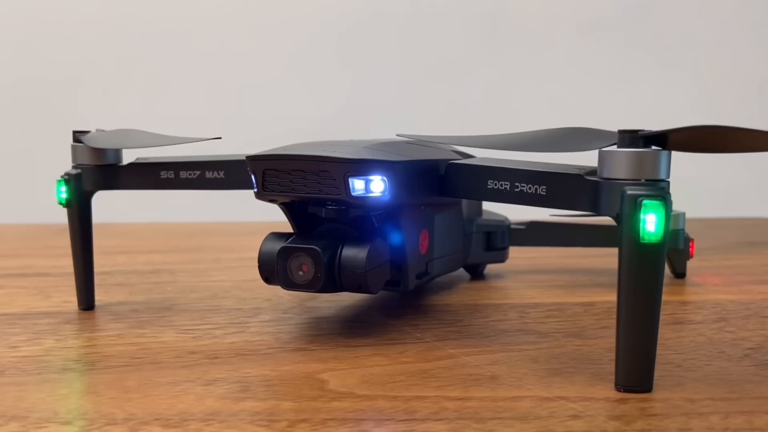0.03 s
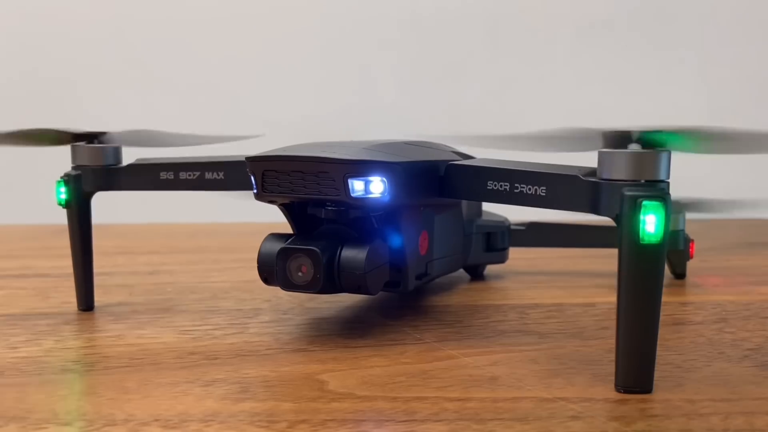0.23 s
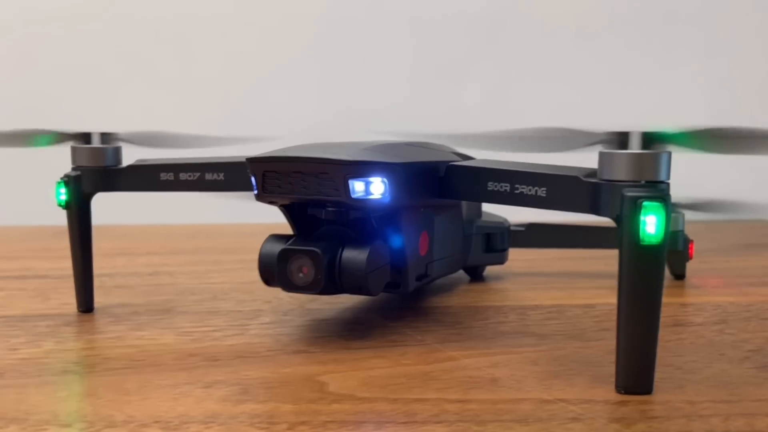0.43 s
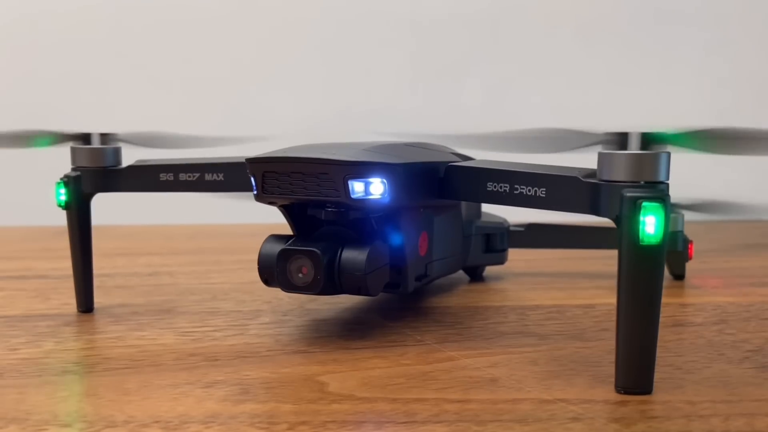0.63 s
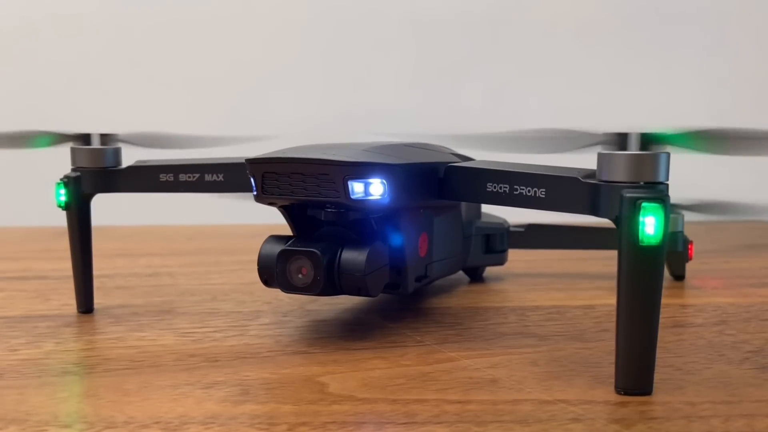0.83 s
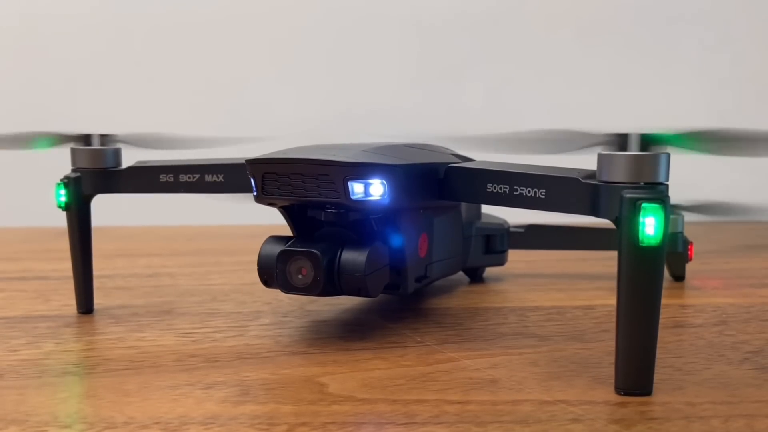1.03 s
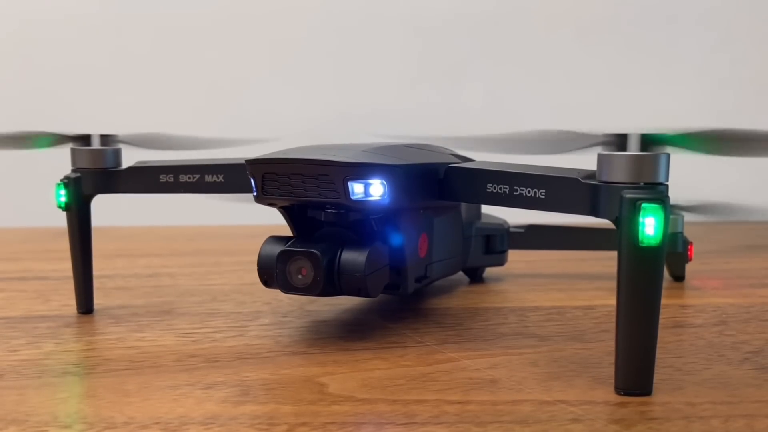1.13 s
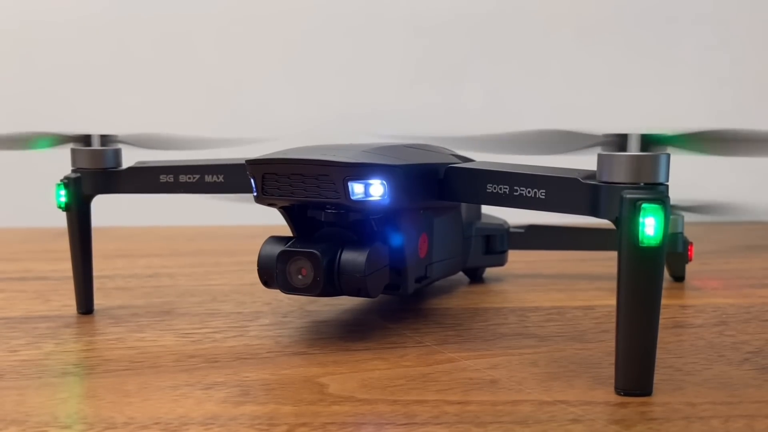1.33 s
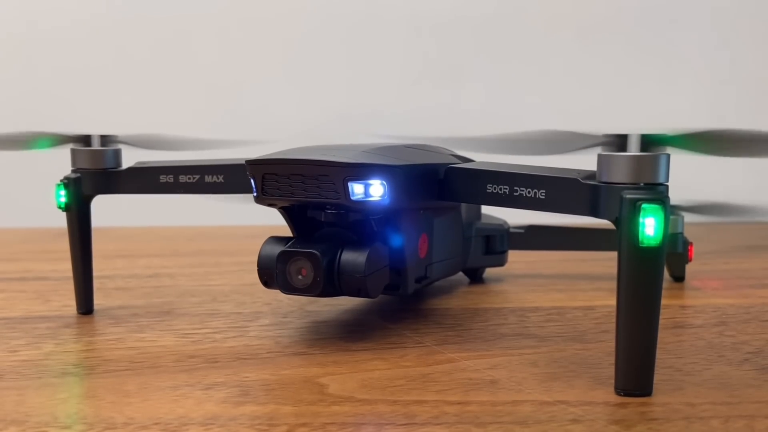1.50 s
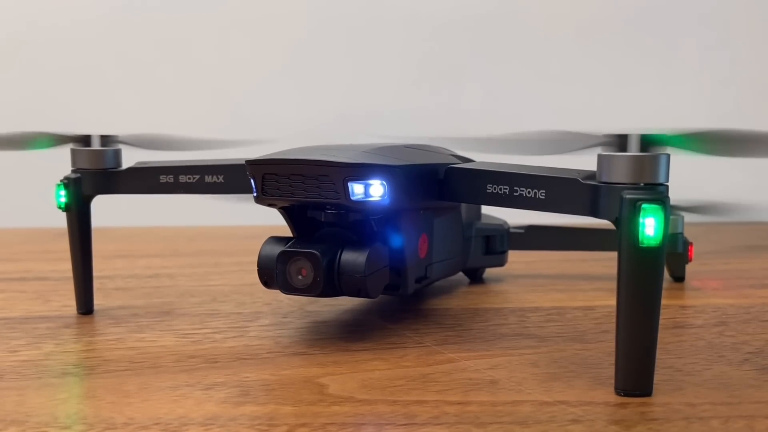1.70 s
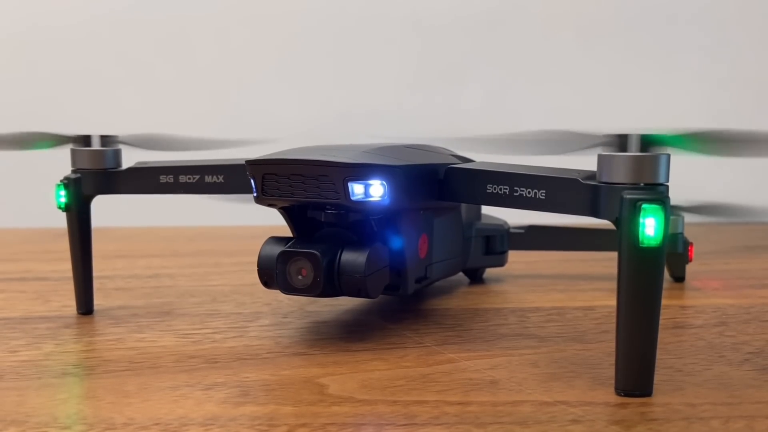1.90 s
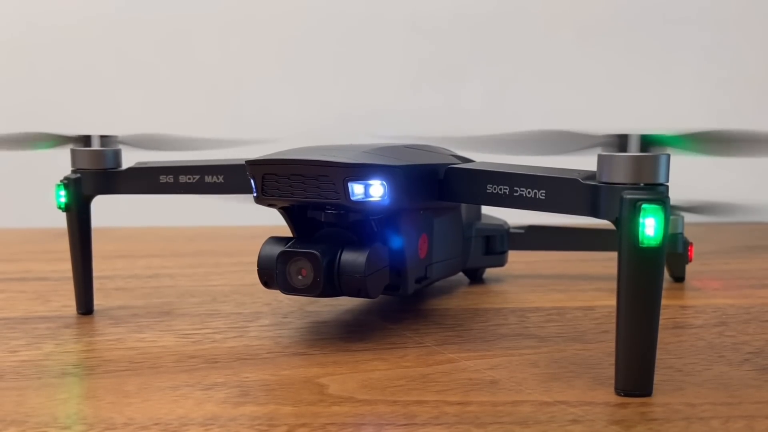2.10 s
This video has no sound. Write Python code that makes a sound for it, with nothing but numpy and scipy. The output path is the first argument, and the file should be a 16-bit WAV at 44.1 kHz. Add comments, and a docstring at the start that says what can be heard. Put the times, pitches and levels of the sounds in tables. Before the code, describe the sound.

A small quadcopter drone starts up close to the microphone in a quiet small room. Sharp plastic blade clacks come at 0.05-0.2 s, then the whine jumps up around 0.28 s, dips, and climbs again to about 0.7 s. Hard low wind buffeting bursts at 0.33 s and from 0.5 to 0.8 s. Pitch falls quickly, leaving a steady, slightly beating high whine, hiss and faint flutter until about 2 s.

```python
"""Small quadcopter starting up on a table

Indoors in a quiet room: a small quadcopter on a wooden table, close to a two-port microphone.
Folding blades clack open as noise bursts with a plastic ring; four brushless motors, as sums of sines, surge
twice and sink to idle, whining at slightly different speeds over the filtered-noise hiss of their drive.
Downwash buffets the microphone as low noise and short pressure waves: hard in the surges, lighter afterwards."""
import sys
import numpy as np
from scipy import signal
from scipy.fft import rfft, irfft, next_fast_len
from scipy.io import wavfile
from scipy.ndimage import uniform_filter1d, minimum_filter1d, map_coordinates

SR = 44100
rng = np.random.default_rng(int(sys.argv[2]) if len(sys.argv) > 2 else 0)


def to_wav(s):
    """Save 16-bit WAV."""
    ch = np.atleast_2d(s).T  # columns
    pcm = np.round(np.clip(ch, -1, 1) * 32767)  # PCM
    wavfile.write(sys.argv[1], SR, pcm.astype(np.int16))


N = 94815
T = np.arange(N) / SR  # t/s of every sample
LEFT_RIGHT = np.array([[1], [-1]])


def amp(db):
    """Decibels to gain."""
    return 10 ** (np.asarray(db) / 20)


def unit(x):
    """Scale to rms 1."""
    return x / np.sqrt(np.mean(x ** 2) + 1e-20)


def along(points, hz):
    """Read (f/Hz, value) points on a log frequency axis."""
    f, v = np.transpose(points)
    return np.interp(np.log(hz + 1), np.log(f + 1), v)


def curves(rows):
    """One value per sample for each column after t/s."""
    s, *columns = np.transpose(rows)
    return [np.interp(T, s, column) for column in columns]


def wobble(rate):
    """A smooth random curve with rate knots a second."""
    return map_coordinates(rng.standard_normal(1024), [T * rate + 3], mode="wrap")


def filtered(x, response):
    """Filter x by a response given as a function of frequency."""
    padded = next_fast_len(N + 8192)
    spectrum = rfft(x, padded) * response(np.fft.rfftfreq(padded, 1 / SR))
    return irfft(spectrum, padded)[..., :N]


def sides(lean_db):
    """Left and right gains for a level difference, left over right."""
    return amp(LEFT_RIGHT * lean_db / 2)


def noise(colour):
    """Mono noise of rms 1 with a (f/Hz, level/dB) colour."""
    return unit(filtered(rng.standard_normal(N), lambda hz: amp(along(colour, hz))))


# likeness of the two microphone ports: (f/Hz, correlation, held within +-0.995)
PORT_LIKENESS = [(100, -0.1), (600, 2), (1000, 1.5), (1300, .5), (2000, 0.86), (2800, -0.1), (4000, 2.3),
                 (5500, -0.64), (7000, 2), (8000, 0), (9150, -1.455), (10000, -0.15), (11000, 2.2),
                 (12200, 0), (13200, -1), (14200, -0.3), (15000, .5)]
# how airborne sound leans to one port: (f/Hz, left over right level/dB)
PORT_LEAN = [(350, 4.5), (600, 0.5), (1250, 3.5), (2100, -3), (3100, 5), (4500, 4.5), (6500, 0)]


def airborne(gain):
    """Stereo noise of rms 1 with a given gain per frequency, partly alike at the two ports."""
    def mid_side(hz):
        turn = np.arccos(np.clip(along(PORT_LIKENESS, hz), -.995, .995)) / 2
        return gain(hz) * np.array([np.cos(turn), np.sin(turn)])
    mid, side = filtered(rng.standard_normal((2, N)), mid_side)
    ports = np.array([mid + side, mid - side])
    return unit(filtered(ports, lambda hz: sides(along(PORT_LEAN, hz))))


def rush(colour):
    """Airborne noise with a (f/Hz, level/dB) colour."""
    return airborne(lambda hz: amp(along(colour, hz)))


# whine pitch while spinning up; after the last point the motors coast down: (t/s, f/Hz)
SPIN_UP_PITCH = [(.06, 2116), (.175, 2087), (.195, 1819), (.22, 1835), (.25, 2650), (.285, 3287),
                 (.32, 2663), (.36, 2267), (.41, 2134), (.46, 2245), (.51, 2513), (.57, 2907), (.63, 3370),
                 (.682, 3765)]
IDLE_HZ = 1870
# quick fall, slow settling, and the share of the drop left to the slow one
BRAKE_S, SETTLE_S, SETTLE_SHARE = .08, .18, .17


def motor_speed():
    """Speed relative to idle: two surges, then a coast down with a fast and a slow decay."""
    top_s, top_hz = SPIN_UP_PITCH[-1]
    since = np.maximum(T - top_s, 0)
    quick = (1 - SETTLE_SHARE) * np.exp(-since / BRAKE_S)
    slow = SETTLE_SHARE * np.exp(-since / SETTLE_S)
    pitch = curves(SPIN_UP_PITCH)[0] - (top_hz - IDLE_HZ) * (1 - quick - slow)
    return uniform_filter1d(pitch, size=500) / IDLE_HZ


# colour of the quiet room's noise floor: (f/Hz, relative level/dB)
FLOOR_COLOUR = [(25, -39), (70, -9), (130, -39), (350, 7), (1000, -7), (3000, -29), (15000, -65)]
FLOOR_DB = -60


def room_floor():
    """The quiet room's steady background, as coloured noise on both ports."""
    return amp(FLOOR_DB) * rush(FLOOR_COLOUR)


EDDY_FALL = 0.33  # how far the pitch leans downward in passing


def eddy(s, hz, length):
    """A swirl of air passing the port: a short pressure wave that ends lower in pitch than it began."""
    u = (T - s) / length
    turns = hz * length * (np.arcsinh(u) - EDDY_FALL * np.log(1 + u ** 2) / 2)
    turns = turns + rng.normal(0, 0.071)
    return -np.sin(2 * np.pi * turns) / (1 + u ** 2) ** 1.91


# strength of the downwash at the microphone, before lumps and low cut: (t/s, level/dB)
WASH_STRENGTH = [(0, -53), (.05, -60), (.09, -38.5), (.14, -43.5), (.23, -27.5), (.318, -28.5),
                 (.335, -12.5), (.365, -11), (.42, -24.5), (.46, -22.5), (.5, -18.5), (.57, -17),
                 (.61, -13.5), (.69, -14.5), (.75, -15), (.775, -20.5), (.81, -14.5), (.84, -25), (.9, -34),
                 (1.05, -34), (1.13, -34.5), (1.25, -37.5), (1.4, -40.5), (1.65, -38.5), (1.85, -42),
                 (2.15, -48)]
# colours of the deep and the brighter turbulence: (f/Hz, relative level/dB)
RUMBLE_COLOUR = [(15, -65), (30, -16), (45, -12), (62, 3), (100, -0.5), (160, -6), (250, -12.5),
                 (400, -17.5), (700, -41), (1500, -66), (4000, -100)]
FLUTTER_COLOUR = [(60, 9), (160, -6), (330, -12.5), (460, -1), (620, -10.5), (850, -21.5), (1300, -29.5),
                  (3000, -66), (8000, -90)]
# strong eddies striking the microphone: (t/s, level/dB, f/Hz in the middle, length/s)
STRONG_EDDIES = [(.331, 0, 166, 0.0049), (.339, -10, 440, 0.0043), (0.354, -4, 340, 0.0029),
                 (0.364, -5, 140, 0.0037), (0.374, -12, 490, 0.0036), (.395, -16.5, 305, 0.0052),
                 (0.467, -13.5, 250.3, 0.0038), (0.494, -6.5, 260.8, 0.0038), (0.511, -10.5, 80.5, .0074),
                 (0.534, -9, 133, 0.0063), (0.554, -8.5, 262, 0.0057), (0.576, -9.5, 296, .003),
                 (0.594, -10, 430, 0.0056), (.606, 4, 260, 0.0023), (0.618, -10.5, 460, 0.0022),
                 (.629, -6.5, 358, 0.0041), (0.647, 0.5, 307.7, .0026), (.665, 3, 420, 0.0042),
                 (.679, 0, 436, 0.002), (.703, -10, 460, 0.0019), (0.707, -7.5, 256, 0.0031),
                 (0.733, -8.5, 450, 0.0038), (0.737, -0.5, 230, 0.0031), (0.8, -6, 600, 0.0021),
                 (.802, 2, 243, .0027), (.846, -16.5, 432.4, .0036), (.858, -25, 260, .004),
                 (1.003, -26.5, 199.7, 0.0043), (1.046, -25, 299, 0.0039), (1.095, -29.5, 218, 0.0034),
                 (1.172, -19, 129.9, 0.0033), (1.255, -24, 135.3, 0.0032), (1.298, -22.5, 150.5, 0.0055),
                 (1.309, -24, 295, 0.0025), (1.402, -27.5, 167, 0.0058), (1.496, -32, 399.2, 0.0048),
                 (1.51, -21, 167.8, 0.0053), (1.637, -28, 130, .006), (1.737, -29, 149.4, 0.0053),
                 (1.948, -33, 394, 0.0054), (2.083, -31.5, 243, 0.0064)]
# lean of the wind noise: (f/Hz, left over right level/dB)
WIND_LEAN = [(60, 0.5), (250, -0.8), (400, 0), (520, 5.5), (750, 9)]
# flutter against the peak rumble; its steepness with strength; growth per octave of motor speed
FLUTTER_DB, FLUTTER_GROWS, FLUTTER_SPEED_DB = -10, 1.34, 10.5
SLAP_HZ, SLAP_S, SLAP_DB = 765, 0.0011, -13.5  # level is for an eddy twice as long as the slap
# small eddies: level over the wash, raised at random by up to twice the scatter; pitch within an octave
PUFFS_PER_S, PUFF_DB, PUFF_SCATTER_DB, PUFF_HZ, PUFF_S = 12, -1.5, 6, 230, 0.0035
LOW_CUT_HZ = 42  # the microphone's wind filter


def downwash(speed, lumps_db=2, flutter_lumps_db=4, apart_db=-21):
    """Turbulence on the microphone: rumble, flutter growing with air strength, strong eddies and puffs."""
    wash_db, = curves(WASH_STRENGTH)
    lumps = wobble(80)
    shared = noise(RUMBLE_COLOUR)
    opposed = amp(apart_db) * LEFT_RIGHT * noise(RUMBLE_COLOUR)
    rumble = amp(wash_db + lumps_db * lumps) * (shared + opposed)
    peak_db = wash_db.max()
    flutter_db = peak_db + FLUTTER_GROWS * (wash_db - peak_db) + FLUTTER_DB
    flutter_db = flutter_db + FLUTTER_SPEED_DB * np.log2(speed)
    air = rumble + amp(flutter_db + flutter_lumps_db * lumps) * noise(FLUTTER_COLOUR)
    for s, db, hz, length in STRONG_EDDIES:
        t = T - s
        slap = amp(SLAP_DB) * np.sin(2 * np.pi * SLAP_HZ * t) * np.exp(-(t / SLAP_S) ** 2)
        slap = slap * (2 * SLAP_S / length) ** 2  # short eddies slap hardest
        air = air + amp(db) * (eddy(s, hz, length) - slap)
    for when, size, pitch in rng.random((round(PUFFS_PER_S * T[-1]), 3)):
        i = int(when * N)
        puff = eddy(T[i], PUFF_HZ * 2 ** (2 * pitch - 1), PUFF_S)
        air = air + amp(wash_db[i] + PUFF_DB + PUFF_SCATTER_DB * 2 * size) * puff

    def wind_filter(hz):
        low_cut = hz ** 3 / np.hypot(hz ** 3, LOW_CUT_HZ ** 3)
        return sides(along(WIND_LEAN, hz)) * low_cut
    return filtered(air, wind_filter)


# level of the drive's hiss, before its grain: (t/s, level/dB)
HISS_LEVEL = [(.04, -76), (.06, -33.5), (.13, -38), (.18, -46.5), (.19, -27), (.215, -26), (.27, -27.5),
              (.32, -39), (.41, -44.5), (.5, -36.5), (.58, -32.5), (.65, -27.5), (.72, -39.5), (.83, -47.5),
              (1.1, -47.5), (2.15, -49.5)]
# colour of the hiss: (f/Hz, relative level/dB)
DRIVE_COLOUR = [(300, -14), (1200, 1), (2200, -1.5), (2900, 5.5), (3800, 0), (5200, 2), (6500, 0.5),
                (8000, 0), (9100, 12), (10300, 2), (12000, 0.5), (14000, 0.5), (15700, -6)]
FIZZ_HZ, FIZZ_WIDTH_HZ, FIZZ_DB = 9080, 173.5, -41  # level before its swell


def drive(grain_db=1.0):
    """The switching drive: grainy noise at listed levels, with a narrow band of fizz that swells in."""
    hiss = amp(curves(HISS_LEVEL)[0] + grain_db * wobble(540)) * rush(DRIVE_COLOUR)

    def narrow_band(hz):
        off_hz = hz - FIZZ_HZ
        return 1 / np.hypot(1, 2 * off_hz / FIZZ_WIDTH_HZ) / np.hypot(1, off_hz / 1200)
    swell_db = np.interp(T, [.04, .06, .8, 1.25], [-50, -21, -9, -2.5])
    return hiss + amp(FIZZ_DB + swell_db) * airborne(narrow_band)


# colour of air off the blades, also used for the frame's rattle: (f/Hz, relative level/dB)
AIR_COLOUR = [(60, 10), (150, -19), (350, 0), (650, 3), (1000, 1), (1400, 2), (1700, -1), (2150, 2),
              (2500, -5.5), (4000, -10), (8000, -33), (16000, -14)]
RUSH_DB, RUSH_GROWS_DB, CHOP = -43.5, 10.5, 0.17  # at idle; per octave of speed; depth of blade chop
STEPS_PER_TURN = 42  # whine cycles in one turn of the shaft


def propellers(speed):
    """Air rushes off the blades, chopped twice a turn and louder with speed."""
    turns = np.cumsum(speed) * IDLE_HZ / STEPS_PER_TURN / SR
    chop = 1 + CHOP * np.sin(2 * np.pi * 2 * turns)
    level = amp(RUSH_DB + RUSH_GROWS_DB * np.log2(np.maximum(speed, 1)))
    onset = np.clip((T - .045) / 0.011, 0, 1)
    return level * onset * chop * rush(AIR_COLOUR)


# blades snapping open: (t/s, level/dB)
BLADE_CLACKS = [(0.047, -34.5), (0.058, -22), (0.0698, -15), (0.0709, -16.5), (.079, -22.5),
                (0.0858, -15.5), (.088, -15.5), (0.1137, -21), (0.188, -29.5)]
# ringing modes of the plastic, before random variation: (f/Hz, relative level/dB, 60 dB decay/s)
PLASTIC_MODES = [(618, -9, 0.091), (1001, -1, 0.066), (1387, -0.5, 0.043), (1595, -3, 0.029),
                 (1907, -4, .04), (2092, -4.5, 0.096), (2560, -6, 0.036)]
# colour of the crack: (f/Hz, relative level/dB)
CRACK_COLOUR = [(100, -39), (400, -22), (1000, 3.5), (1450, 8.5), (2000, 5.5), (2300, -21), (2700, -3.5),
                (4500, -4), (7000, -7), (9000, -13.5), (15000, -9.5)]
CRACK_T60, RATTLE_T60, CLACK_RISE_S = 0.021, 0.16, 0.00018  # seconds
RATTLE_DB, RING_DB = -19, -7  # against the crack


def blades():
    """Hinged blades hit their stops: a crack, a short plastic ring and a rattle of the frame."""
    out = np.zeros((2, N))
    crack, rattle = rush(CRACK_COLOUR), rush(AIR_COLOUR)
    t = T[:SR // 4]
    for s, db in BLADE_CLACKS:
        start = round(s * SR)
        span = slice(start, start + len(t))
        ring = np.zeros(len(t))
        for hz, level_db, t60 in PLASTIC_MODES:
            decay = amp(level_db + rng.normal(0, 2.3) - 60 * t / t60)
            ring += decay * np.sin(2 * np.pi * hz * t + rng.uniform(0, 2 * np.pi))
        body = crack[:, span] * amp(-60 * t / CRACK_T60)
        body = body + rattle[:, span] * amp(RATTLE_DB - 60 * t / RATTLE_T60)
        rise = 1 - np.exp(-t / CLACK_RISE_S)
        out[:, span] += amp(db) * rise * (body + amp(RING_DB) * ring)
    return out


# each motor: (idle whine f/Hz, level/dB of harmonics 1, 2, 3 and 4, left over right level/dB,
# relative hum level/dB, lag behind the throttle/s)
FOUR_MOTORS = [(1835, -0.5, -10, -34, -22, 3, -3.5, .003), (1870, -1, 1, -5.5, -16, 1, 2.5, 0),
               (1906.6, -1.5, -7.5, -6.5, -10, -1.5, 5.5, -.003),
               (1917, -13.5, -16, -17, -8, -9.5, -9.5, -.009)]
# whine before motor and housing offsets: (t/s, fundamental level/dB, overtone level/dB)
WHINE_LEVEL = [(.14, -80, -94), (.175, -50, -70), (.195, -38, -40), (.25, -36.5, -36.5), (.285, -39, -38),
               (.325, -52.5, -46), (.37, -43.5, -48), (.47, -50, -49.5), (.56, -40.5, -43.5),
               (.67, -42.5, -36.5), (.72, -47.5, -55), (.9, -53.5, -57), (1.2, -53, -55.5),
               (2.15, -51.5, -59)]
# hum of blades and magnets: (multiple of shaft speed, idle level/dB before halving and motor offset)
HUM_ORDERS = [(2, -52.5), (4, -55), (6, -55.5), (8, -59), (10, -60), (12, -59.5), (14, -56), (30, -73),
              (48, -59)]
# how well the shell radiates the whine: (f/Hz, gain/dB)
SHELL_GAIN = [(2000, 1.5), (2800, 5), (3400, 1), (4400, 2), (5100, 0.5), (6200, -0.5), (7500, -1.5),
              (8500, -9), (11000, -29)]
SURGE_SPREAD = .45  # share of the speed difference between motors left under full power
# pitch jitter as fractions: while hunting for speed until locked, when braked, and under load
HUNTING, BRAKING_JITTER, SURGE_JITTER = .085, 0.0277, 0.01198
LOCK_S, LOCK_FADE_S = .228, 0.0249
# hum growth per octave of speed; its rise in the hard pull; the whine's drop in the steepest braking
HUM_GROWS_DB, HUM_TORQUE_DB, BRAKING_DB = 11, 9, -1.5
PULL_S, PULL_WIDTH_S = 0.274, 0.058  # when the first hard pull strains the frame, and its width
SAG_HZ_PER_S, SAG_MID_S = 24, 1.8  # idle sinks slowly, passing the listed pitch at this time


def motors(speed, drift=0.001183, flicker_db=2.5, sway_db=3.0, port_turn=0.051):
    """Each motor whines at its commutation rate and hums at shaft multiples; the four beat together."""
    whine_db, overtone_db = curves(WHINE_LEVEL)
    spread = np.interp(T, [.25, .35, .7, .95], [1, SURGE_SPREAD, SURGE_SPREAD, 1])
    slope = np.gradient(speed)
    braking = np.clip(slope / slope.min(), 0, 1)
    jitter = HUNTING * (1 - np.tanh((T - LOCK_S) / LOCK_FADE_S)) / 2
    jitter = jitter + BRAKING_JITTER * braking + SURGE_JITTER * np.clip(speed - 1, 0, 1)
    strain = np.exp(-((T - PULL_S) / PULL_WIDTH_S) ** 2)
    hum_onset = np.clip((T - .15) / 0.084, 0, 1)
    hum = amp(HUM_GROWS_DB * np.log2(speed) + HUM_TORQUE_DB * strain) * hum_onset / 2
    coasting = np.clip(2 * (T - SPIN_UP_PITCH[-1][0]), 0, 1)
    sag_hz = SAG_HZ_PER_S * (SAG_MID_S - T) * coasting
    out = np.zeros((2, N))
    for idle_hz, *harmonics, lean_db, hum_db, lag_s in FOUR_MOTORS:
        lagged_speed = np.interp(T - lag_s, T, speed)
        hz = lagged_speed * (IDLE_HZ + spread * (idle_hz - IDLE_HZ)) + sag_hz
        hz = hz * (1 + drift * wobble(12) + jitter * wobble(420))
        phase = 2 * np.pi * np.cumsum(hz) / SR
        for k, db in enumerate(harmonics, 1):
            level_db = db + (whine_db if k == 1 else overtone_db) + BRAKING_DB * braking
            level = amp(level_db + flicker_db * wobble(70) + sway_db * wobble(6.35))
            shell = amp(along(SHELL_GAIN, k * hz))
            lean = sides(lean_db + along(PORT_LEAN, k * hz))
            port_phase = rng.uniform(0, 2 * np.pi) + port_turn * LEFT_RIGHT
            out += level * shell * lean * np.sin(k * phase + port_phase)
        for order, db in HUM_ORDERS:
            shaft_phase = order * phase / STEPS_PER_TURN + rng.uniform(0, 2 * np.pi)
            out += hum * amp(db + hum_db) * np.sin(shaft_phase)
    return np.sqrt(2) * out


ROOM_T60, ROOM_DB = 0.49, -11.5  # decay in seconds; tail against the direct sound


def room(x):
    """The short tail of a small room, as decaying noise convolved with the sound."""
    t = T[:SR // 3]
    tail = rng.standard_normal((2, len(t))) * amp(-60 * t / ROOM_T60) * (t > .004)
    return signal.fftconvolve(x, tail / np.linalg.norm(tail[0]), axes=1)[:, :N]


def scene():
    """The quadcopter in its quiet room, and its wind on the microphone."""
    speed = motor_speed()
    air = room_floor() + downwash(speed) + drive() + propellers(speed)
    near = blades() + motors(speed)
    return air + near + amp(ROOM_DB) * room(near)


# phase between the microphone ports: (f/Hz, left lead/rad)
LEFT_LEAD = [(50, 0), (250, 0.56), (520, 0.55), (1000, 0.83), (1750, 0), (2200, 1.1), (3100, 1.86),
             (3900, 1.4), (6500, 0.021)]
TOP_HZ = 15900  # band limit


def record(dry):
    """The left port leads in phase; a limiter holds the strongest gusts; the top band is cut off."""
    ports = filtered(dry, lambda hz: np.exp(.5j * LEFT_RIGHT * along(LEFT_LEAD, hz)))
    need = np.minimum(1, .9 / (np.abs(ports).max(axis=0) + 1e-9))
    gain = uniform_filter1d(minimum_filter1d(need, size=260), size=260)
    return filtered(ports * gain, lambda hz: hz < TOP_HZ)


dry = scene()
out = record(dry)
to_wav(out)
```